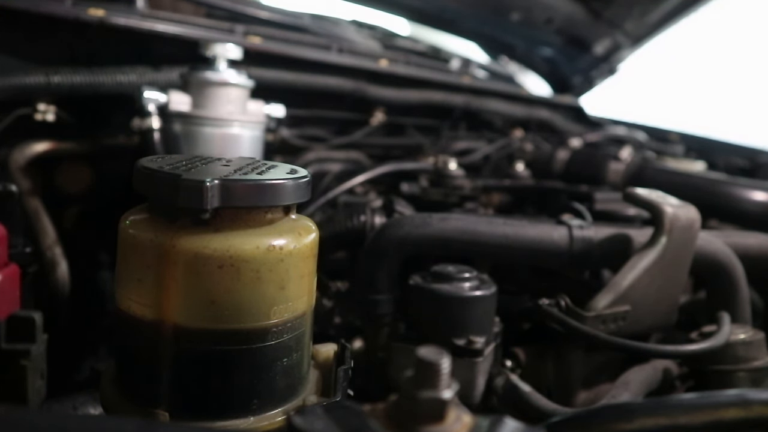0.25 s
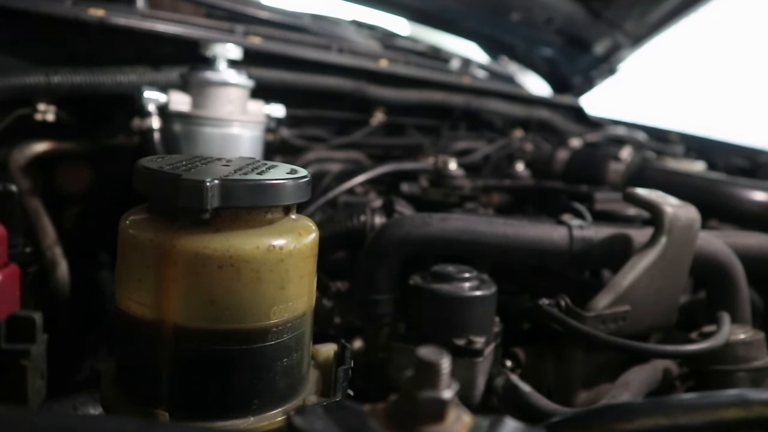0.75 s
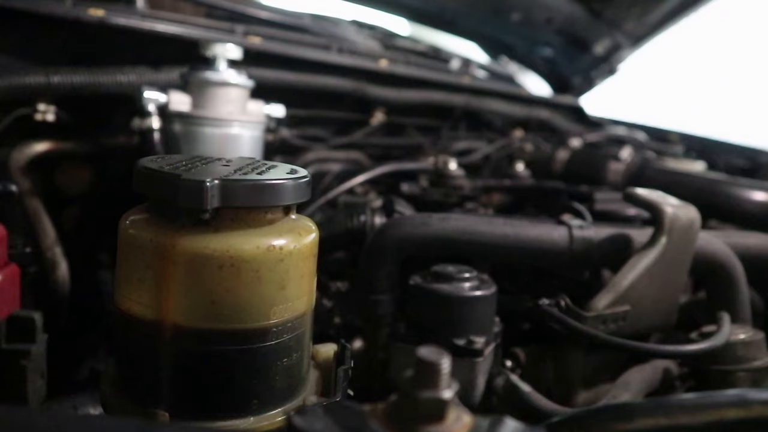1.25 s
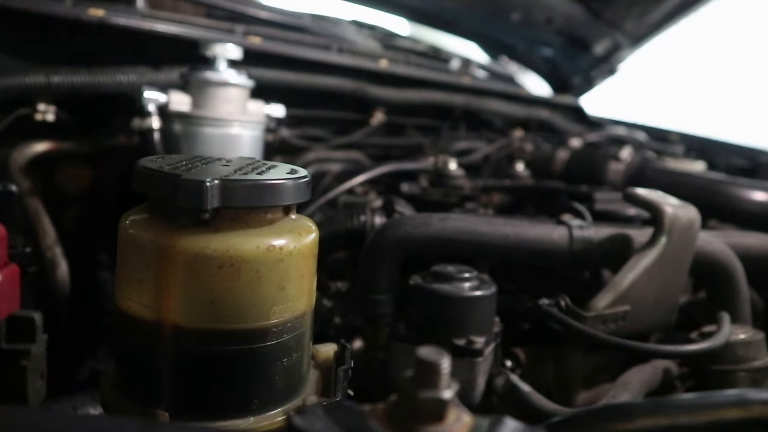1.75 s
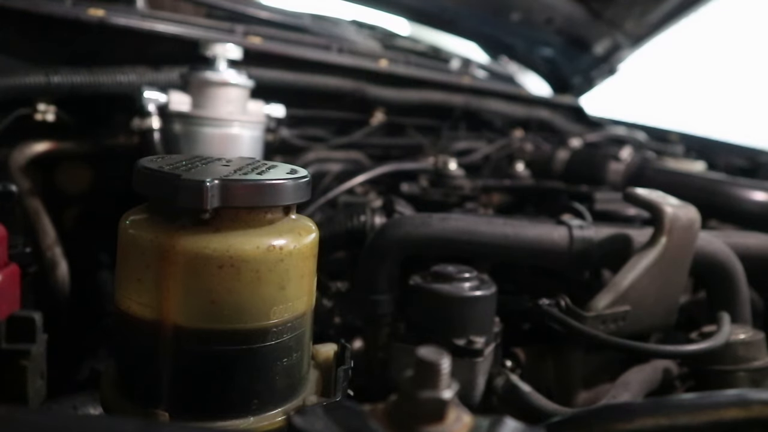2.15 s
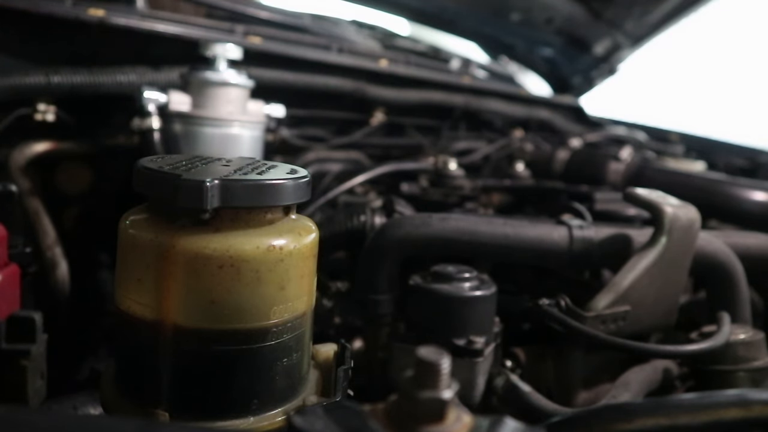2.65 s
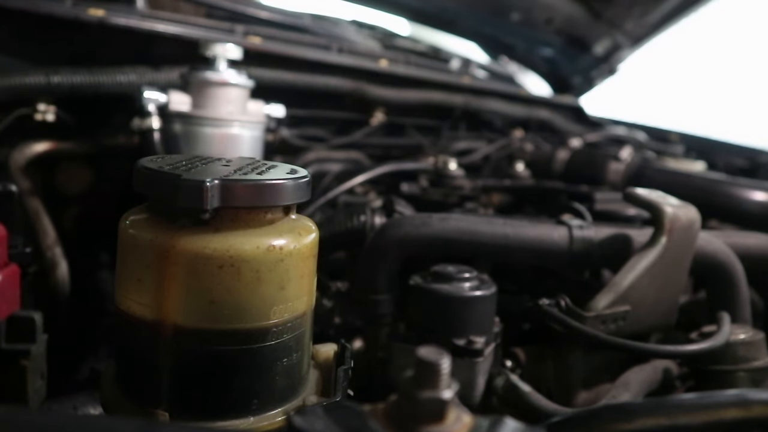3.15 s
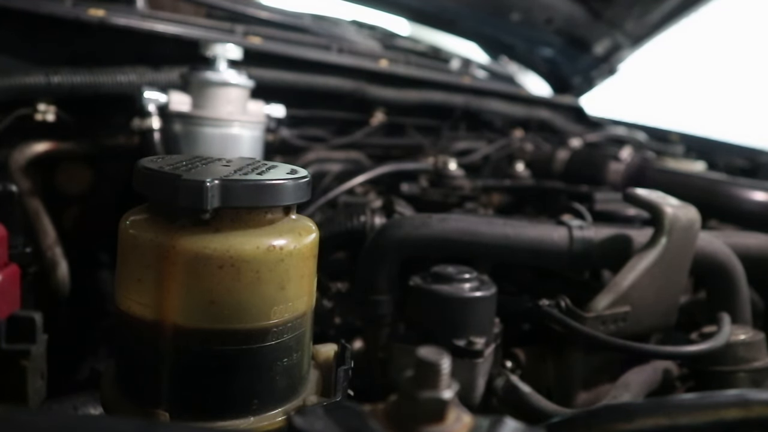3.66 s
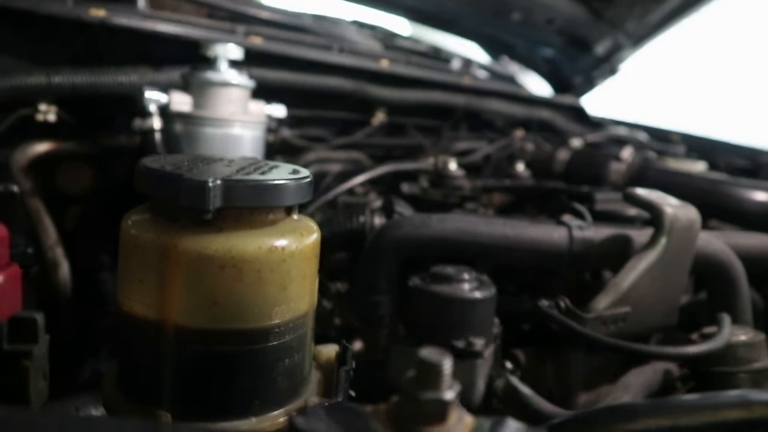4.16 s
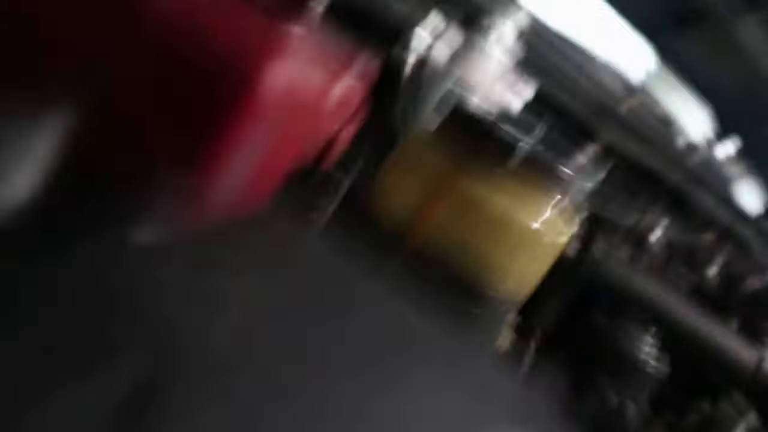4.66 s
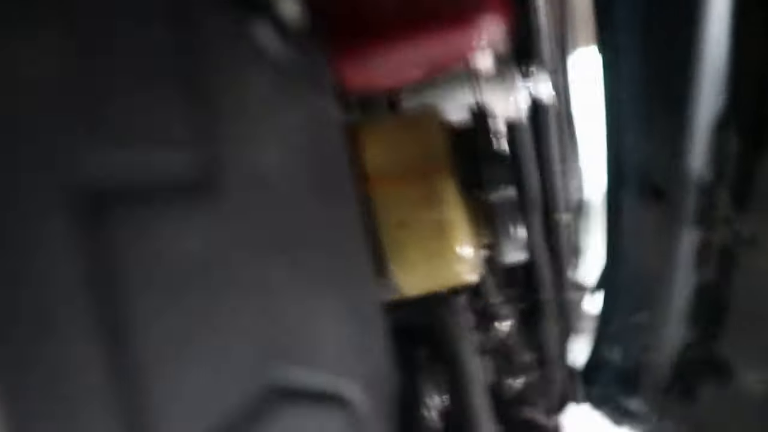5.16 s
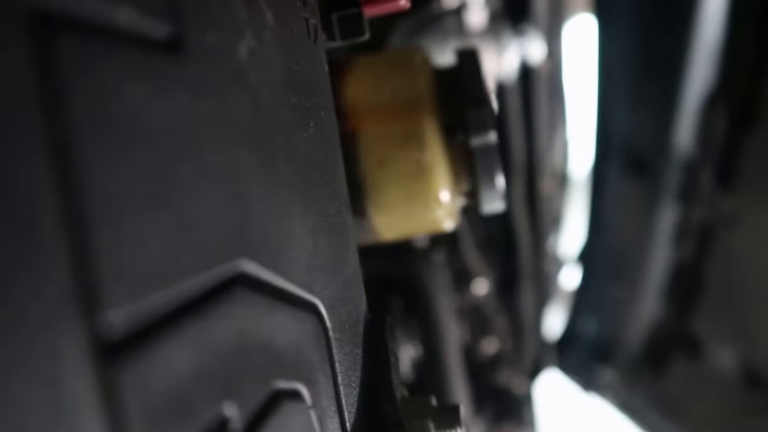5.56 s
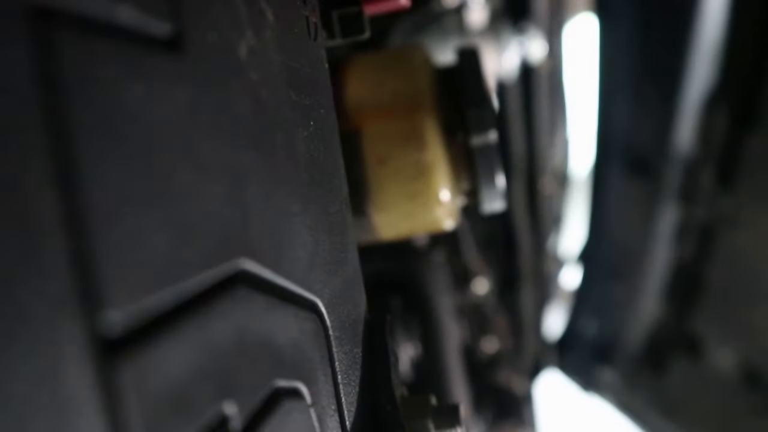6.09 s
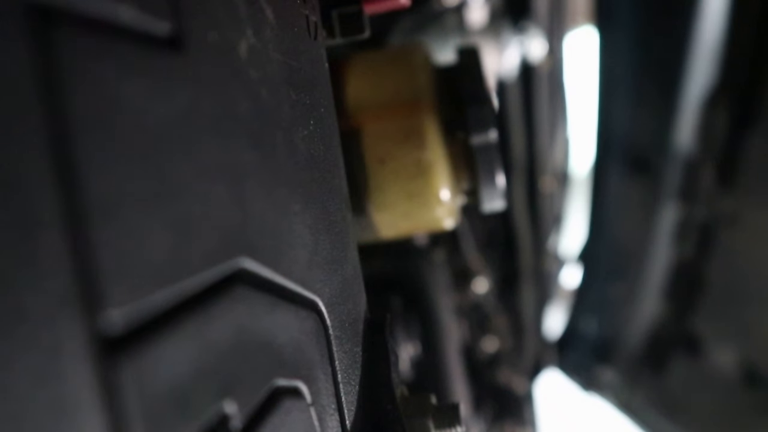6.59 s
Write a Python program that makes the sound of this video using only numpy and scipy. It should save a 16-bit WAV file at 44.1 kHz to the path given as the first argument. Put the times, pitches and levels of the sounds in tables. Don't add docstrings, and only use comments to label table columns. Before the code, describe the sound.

Wind buffets the microphone, relays click, a starter grinds through heavy compressions, the camera topples with hard knocks, and a diesel settles into clattering idle.

```python
import sys
import numpy as np
from scipy import signal
from scipy.fft import rfft, irfft, next_fast_len
from scipy.io import wavfile

SR = 44100
rng = np.random.default_rng(int(sys.argv[2]) if len(sys.argv) > 2 else 0)


def undo_db(level):
    steps = np.asarray(level, float) / 20
    return 10 ** steps


def wav_record(signal):
    frames = np.transpose(np.atleast_2d(signal))
    bounded = np.clip(frames, -1, 1)
    quanta = np.round(bounded * 32767).astype(np.int16)
    wavfile.write(sys.argv[1], SR, quanta)


N = 301203
T = np.arange(N) / SR

# (frequency [Hz], density [dB per Hz])
YARD = [(30, -28), (80, -47), (200, -5.5), (330, -11), (514, -6), (700, -7), (1500, -6), (2710, -8.5),
        (5000, -18), (9840, -33), (12500, -50.5), (16000, -43)]
# (start [s], stop [s], frequency [Hz], level [dB rms], width [Hz])
HUMS = [(0, 3.56, 522, -47, 10), (0, 3.56, 1066, -52, 10), (0, 1.1, 447, -54, 10), (.7, 1.1, 1997, -49, 12),
        (.9, 1.05, 420, -41, 150), (1.2, 3.56, 253, -46, 12), (1.2, 3.56, 500, -48, 8),
        (1.2, 3.56, 802, -50, 10), (4.048, 4.1, 3171, -31, 40), (4.2, 4.24, 2680, -29, 140),
        (4.525, 4.56, 2900, -30, 120), (4.7, 4.79, 110, -40, 160), (4.737, 4.77, 3200, -29, 120),
        (4.843, 4.875, 3210, -28, 90)]
# (time [s], peak level [dB], pitch [Hz])
GUSTS = [(0.009, -16, 179), (0.036, -16.5, 232), (0.09, -15, 186), (0.12, -23, 216), (1.185, -7, 333),
         (1.226, -12.5, 263), (1.248, -24, 259), (1.316, -26, 170), (1.39, -26, 250), (1.58, -21, 189),
         (1.715, -13.5, 230), (1.82, -10.5, 221), (1.861, -9.5, 252), (1.907, -20, 179), (1.944, -11, 240),
         (1.973, -17.5, 180), (2.108, -15, 198), (2.158, -20.5, 189), (2.207, -21, 160),
         (2.261, -15.5, 207), (2.324, -14, 316), (2.505, -19.5, 180), (2.646, -14, 210), (2.774, -1, 490),
         (2.872, -4, 225), (2.959, -17.5, 167), (3.301, -18, 199), (3.342, -17, 230), (3.401, -13.5, 178),
         (3.494, -13, 228)]
# (offset [s], level [dB], pitch ratio [1])
EDDIES = [
    (-.015, -9.5, 0.66),
    (.026, -15, 0.98),
]
# (frequency [Hz], density [dB per Hz])
FLUTTER = [(20, -55), (70, -8.0), (130, -5.5), (300, -20), (700, -47), (2000, -64)]
SWIRL = [(20, -84), (80, -7.5), (250, 6.5), (500, -2), (1000, -16), (2500, -70)]
# (time [s], level [dB rms], chatter [s], t60 [s], body [index])
RELAYS = [
    (0.986, -30, 0.0043, 0.036, 0),
    (1.131, -16.5, 0.0075, 0.039, 0),
    (1.145, -25.5, 0.017, 0.15, 0),
    (1.16, -33, 0.007, 0.046, 0),
    (1.422, -23, 0.012, 0.11, 1),
    (1.678, -22, 0.017, 0.092, 1),
]
# (frequency [Hz], width [Hz], level [dB])
RELAY_BODIES = [
    [(500, 440, 2), (980, 430, 2), (1650, 350, -1), (2720, 690, -3.5), (5300, 750, -6.5), (7840, 1700, -12),
     (11400, 3500, -26)],
    [(580, 8.8, 11.5), (1380, 140, 2), (1830, 120, -3.5), (2540, 470, -10.5), (4040, 174, -1.5),
     (7400, 4400, -21.5), (11800, 4000, -30)],
]
# (start [s], stop [s], from [Hz], to [Hz], level [dB rms])
SQUEAKS = [
    (5.32, 5.42, 7300, 8100, -55),
    (5.315, 5.375, 6000, 6050, -58),
    (5.44, 5.53, 8000, 8400, -59),
]
# (time [s], ring [dB], thud [dB], tick [dB])
KNOCKS = [(4.91, 5.5, -15, -5), (4.919, -4.5, -34, -13.5), (4.9253, -2, -24, -28), (5.126, -31, -48, -37),
          (5.133, -33, -45, -39), (5.143, -12, -9.5, -8), (5.1455, -9.5, -23, -27),
          (5.159, -17, -47, -16.5), (5.187, -28, -53, -38), (5.232, -27.5, -35, -30),
          (5.251, -32, -51, -46), (5.275, -39, -45, -31), (5.278, -27, -51, -29), (5.307, -32, -51, -34),
          (5.335, -30, -47, -42)]
# (frequency [Hz], width [Hz], level [dB])
CASE_LOW = [(304, 390, -6), (120, 530, -9.5)]
CASE_MID = [(980, 180, -0.5), (1540, 360, -4.5), (1805, 122, 4), (3420, 1200, -8.5)]
CASE_HIGH = [(5370, 830, 9.5), (7600, 880, 3.5), (9000, 3300, -2.5), (14700, 2900, -35)]
# (time [s], level [dB rms], hold [s], t60 [s])
STROKES = [(3.546, -18.5, 0.016, 0.25), (3.577, -13.5, 0.032, 0.078), (3.653, -31, 0.068, 0.074),
           (3.715, -17, 0.0083, 0.065), (3.793, -20, 0.074, 0.14), (3.966, -18, 0.04, 0.12),
           (4.047, -31.5, 0.021, .15), (4.082, -16.5, 0.028, 0.22), (4.193, -14.5, 0.021, 0.25),
           (4.305, -15, 0.029, 0.26), (4.408, -14, 0.023, 0.36), (4.519, -12.5, 0.025, 0.22),
           (4.621, -16, 0.024, 0.36), (4.734, -15.5, 0.046, 0.07), (4.799, -16, 0.0072, 0.025),
           (4.839, -15.5, 0.031, 0.56), (4.956, -22, 0.0054, 0.091), (4.982, -21.5, 0.0074, 0.099)]
# (time [s], level [dB])
STARTER_RUN = [
    (3.54, -66),
    (3.56, -16),
    (3.78, -23),
    (4.0, -21),
    (4.9, -23.5),
    (5.0, -46),
    (5.02, -47),
    (5.05, -72),
]
# (frequency [Hz], density [dB per Hz])
GRIND = [(90, -49), (150, -15.5), (450, -6.5), (680, -3.5), (1000, -4.5), (1460, -2), (2270, -9.5),
         (3150, -13.5), (5500, -20), (9270, -28.5), (12500, -38), (16000, -58)]
# (frequency [Hz], width [Hz], level [dB])
HOUSING = [(743, 38, -1.5), (794.5, 41, -1.5), (1021, 8.9, -4), (1187, 24, -5.5), (1326, 15.5, -5.5),
           (1440, 29, -2), (1490, 52, -10), (1607, 57, -12), (1780, 105, -20), (2000, 54, -19),
           (2780, 100, -16.5), (2945, 35, -19), (3130, 70, -20.5), (4150, 62, -19)]
# (frequency [Hz], width [Hz], level [dB])
BLOCK = [(1360, 130, 0), (1460, 130, 0), (1600, 140, -5), (1050, 250, -11), (2010, 250, -11),
         (2990, 500, -14), (3750, 450, -15)]
INJECTORS = [(5460, 420, 0), (6720, 940, -1), (7900, 650, -0.5), (9000, 2300, -7), (12700, 3000, -16)]
COVER = [(1421, 250, 0)]
# (frequency [Hz], density [dB per Hz])
RUMBLE = [(30, -55), (100, -11.5), (220, -11.5), (460, -5.5), (700, -6.5), (1100, -7), (2500, -15.5),
          (4000, -25.5), (4600, -27.5), (7000, -34), (12000, -46.5), (16000, -64)]
CYLINDER_DB = [-1, 2.5, -1.5, 0]
# (time [s], rate [firings per s])
SPEED = [
    (5.3, 20),
    (5.45, 29),
    (5.58, 31.5),
    (6.0, 30.85),
    (6.1, 30.1),
    (6.49, 27.95),
    (6.83, 26.5),
]
# (time [s], level [dB], hold [s], t60 [s])
CATCHES = [
    (5.053, -29, 0.037, 0.13),
    (5.15, -34, 0.021, 0.17),
    (5.266, -36, 0.046, .2),
]
IDLE_DB = [-34, -26.5, -48.5, -30]
IDLE_FOLLOWS = [1, 1.32, 0.53, 1.36]
CATCH_DB = [-1.5, -7.5, -22.5]
# (frequency [Hz], level [dB])
WIDTH = [(60, -48), (110, -85), (200, -61), (380, -43), (700, -44.5), (1290, -23), (2380, -8.5), (4400, -3),
         (8120, 4), (15000, 8.5)]


def rms_one(x):
    return x / np.sqrt(np.mean(x[0] ** 2) + 1e-20)


def curve(rows):
    return np.interp(T, *np.transpose(rows))


def coloured(x, spectrum):
    size = next_fast_len(N)
    hz, db = np.transpose(spectrum)
    bins_hz = np.arange(size // 2 + 1) * SR / size
    gain = undo_db(np.interp(np.log(bins_hz + 1), np.log(hz), db))
    return irfft(rfft(x, size) * gain, size)[..., :N]


def resonate(x, modes):
    out = 0
    for k, (hz, width, db) in enumerate(modes):
        r = np.exp(-np.pi * width / SR)
        b = (1 - r * r) / 2 * np.array([1, 0, -1])
        a = [1, -2 * r * np.cos(2 * np.pi * hz / SR), r * r]
        out = out + (-1) ** k * undo_db(db) * signal.lfilter(b, a, x + 1e-18)
    return out


def wander(rate):
    r = np.exp(-2 * np.pi * rate / SR)
    slow = signal.lfilter([1], [1, -2 * r, r * r], rng.standard_normal(N))
    return slow / slow.std()


def grains(spread_db, rate):
    return rms_one(rng.standard_normal((2, N)) * undo_db(spread_db * wander(rate)))


def burst(s, db, hold, t60, rise):
    out, at = np.zeros(N), slice(round(s * SR), round((s + hold + t60) * SR))
    t = T[at] - s
    out[at] = undo_db(db - 60 * np.maximum(t - hold, 0) / t60) * np.clip(t / rise, 0, 1)
    return out


def background_db():
    since = T - 3.56
    return -1.5 * np.clip(since / .08, 0, 1) - 11.5 * np.maximum(since, 0)


def yard():
    wash = undo_db(-34 + background_db()) * rms_one(coloured(grains(0.21, 15), YARD))
    noise, drift = rng.standard_normal((2, N)), wander(1.6)
    for start, stop, hz, db, width in HUMS:
        at = slice(round(start * SR), round(stop * SR))
        steady = .7 * (width < 15)
        on = np.clip(np.minimum(T[at] - start, stop - T[at]) / 0.007, 0, 1)
        mode = [(hz, width, 0)]
        band = rms_one(resonate(resonate(noise[:, at], mode), mode))
        tone = 2.27 * np.sin(2 * np.pi * hz * T[at] + 1.36 * drift[at])
        wash[:, at] += on * undo_db(db) * ((1 - steady) * band + steady * tone)
    return wash


def wind():
    calm_db, flutter_db, flutter_s, drops_s = -49, -40.5, 0.054, 4.95
    flutter = rms_one(coloured(grains(0.94, 52), FLUTTER))
    swirl = rms_one(coloured(grains(4.0, 33), SWIRL))
    coarse = T[::64]
    swell = undo_db(calm_db) ** 2
    for s, db, hz in GUSTS:
        swell = swell + undo_db(flutter_db + .1 * (db + 24)) ** 2 * np.exp(-((coarse - s) / flutter_s) ** 2)
    dropping = undo_db(-16 * np.clip((T - drops_s) / 0.15, 0, 1))
    out = np.interp(T, coarse, np.sqrt(swell)) * dropping * flutter
    puffs = list(GUSTS)
    for (s, db, hz), luck in zip(GUSTS, rng.uniform(-1.05, 1, (len(GUSTS), 2, 2))):
        for (lag, less_db, ratio), (late, more) in zip(EDDIES, luck):
            puffs.append((s + lag * (1 + 0.295 * late), db + less_db + 4.4 * more, hz * ratio))
    for (s, db, hz), phase in zip(puffs, rng.random((len(puffs), 2))):
        at = slice(max(round((s - .04) * SR), 0), round((s + .04) * SR))
        cycles = (T[at] - s) * hz
        swing = np.exp(-(cycles / 0.45) ** 2) * np.cos(2 * np.pi * (cycles + phase[:, None]))
        lump = undo_db(-16.0) * np.exp(-((T[at] - s) / 0.013) ** 2) * swirl[:, at]
        out[:, at] += undo_db(db - 1.17) * (swing + lump)
    return out


def relays():
    bodies = [rms_one(resonate(grains(1.1, 500), modes)) for modes in RELAY_BODIES]
    return sum(burst(s, db, hold, t60, 0.0011) * bodies[int(body)] for s, db, hold, t60, body in RELAYS)


def belt():
    out, wobble = 0, 1 + .025 * rng.standard_normal(N // 64 + 1).repeat(64)[:N]
    for start, stop, from_hz, to_hz, db in SQUEAKS:
        way = np.clip((T - start) / (stop - start), 0, 1)
        pitch = (from_hz + (to_hz - from_hz) * way) * wobble
        out = out + undo_db(db + 3) * np.sin(np.pi * way) * np.sin(2 * np.pi * np.cumsum(pitch) / SR)
    return out


def camera():
    noise, out = rng.standard_normal((2, N)), 0
    parts = [(CASE_MID, 1.5, 14), (CASE_LOW, 1.5, 15), (CASE_HIGH, .1, 9)]   # modes, push, trim (dB)
    for k, (modes, push, trim_db) in enumerate(parts):
        blows = sum(burst(row[0], row[k + 1], .00015, .003, .0001) for row in KNOCKS)
        out = out + undo_db(trim_db) * resonate((noise - push) * blows, modes)
    return out


def starter():
    meshed_s, released_s = 3.6, 4.95
    run = undo_db(curve(STARTER_RUN))
    strokes = []
    for s, db, hold, t60 in STROKES:
        blow = burst(s, db - 6, .004, .06, .002)
        strokes.append(burst(s, db, hold, t60, .006) + blow)
    strokes = np.array(strokes)
    times = np.array([row[0] for row in STROKES])
    slam, drop = times < meshed_s, times > released_s
    bright_db = 7.5 * slam - 36 * drop
    low_db = -2.5 - 6 * slam - 6 * drop
    teeth, rings = grains(3.3, 190), 0
    uneven_db = 4 * rng.standard_normal((len(HOUSING), len(STROKES)))
    for k, (mode, share_db) in enumerate(zip(HOUSING, uneven_db)):
        low, high = mode[0] < 900, mode[0] > 2000
        share_db = share_db + low_db * low + bright_db * high
        drive = run * undo_db(-2 - 7 * high - 5 * low) + undo_db(share_db) @ strokes
        ragged = undo_db(2.2 * wander(40))
        rings = rings + (-1) ** k * resonate(teeth * drive * ragged, [mode])
    broad = rms_one(coloured(grains(1.1, 300), GRIND))
    treble = signal.sosfilt(signal.butter(2, 2200, "high", fs=SR, output="sos"), broad)
    bite = run * undo_db(3.0) + undo_db(bright_db) @ strokes
    grind = (broad - treble) * (run + strokes.sum(axis=0)) + treble * bite
    return undo_db(16) * rings + undo_db(-7) * grind


def recovery_db():
    return -12.5 * np.exp(-np.maximum(T - 5.28, 0) / 0.59)


def boom(turn):
    dips = sum(np.exp(-((T - s) / .05) ** 2) for s in [6.0, 6.29, 6.54])
    level = undo_db(-36 + 0.71 * recovery_db() - 14 * dips) * np.clip((T - 5.5) / 0.022, 0, 1)
    return level * np.sin(2 * np.pi * 5 * turn)


def engine():
    catches = sum(burst(s, db, hold, t60, 0.0045) for s, db, hold, t60 in CATCHES)
    idle = [undo_db(db + share * recovery_db()) for db, share in zip(IDLE_DB, IDLE_FOLLOWS)]
    clatter_gain, rumble_gain, tick_gain = [g + undo_db(db) * catches for g, db in zip(idle, CATCH_DB)]
    on = np.clip((T - 5.03) / 0.019, 0, 1)
    turn = np.cumsum(curve(SPEED)) / SR
    turn = np.maximum(turn - turn[round(5.579 * SR)] + 14, 0)
    firing, part = np.floor(turn).astype(int), turn % 1
    strength = undo_db(np.array(CYLINDER_DB)[firing % 4] + 1.2 * rng.standard_normal(60)[firing])
    strength = strength * np.clip((T - 5.2) / .4, .3, 1)
    late = rng.uniform(.2, .6, 60)[firing]
    crack = np.exp(-part / .35) + .9 * np.exp(-part / .07)
    rattle = .4 * np.exp(-((part - late) / .06) ** 2)
    knock = .28 + strength * (crack + rattle)
    tick = .25 + strength * np.exp(-part / .15)
    block = rms_one(resonate(grains(1.0, 200) * knock, BLOCK))
    ticks = rms_one(resonate(grains(1.5, 400) * tick, INJECTORS))
    rumble = rms_one(coloured(grains(1.25, 30) * (1 + 0.14 * knock), RUMBLE))
    cycle = (turn - 1) % 4
    strike = knock * np.exp(-cycle / 6.8) + 0.83 * np.exp(-cycle / 0.049)
    cover = rms_one(resonate(resonate(grains(1.0, 120) * strike, COVER), COVER))
    running = clatter_gain * block + rumble_gain * rumble + tick_gain * ticks + idle[3] * cover
    return on * running + boom(turn)


def scene():
    gusts = wind()
    mid, side = yard() + gusts + relays() + belt() + camera() + starter() + engine()
    side = coloured(side, WIDTH) + undo_db(-31.5) * gusts[1]
    lean_db = .7 * np.clip((T - 5.0) / .3, 0, 1) / 2
    return np.array([(mid + side) * undo_db(lean_db), (mid - side) * undo_db(-lean_db)])


def top_cut(x):
    return signal.sosfilt(signal.butter(12, 15900, fs=SR, output="sos"), x)


def record(dry):
    mix = np.clip(dry, -1, 1)
    return top_cut(mix)


dry = scene()
out = record(dry)
wav_record(out)
```